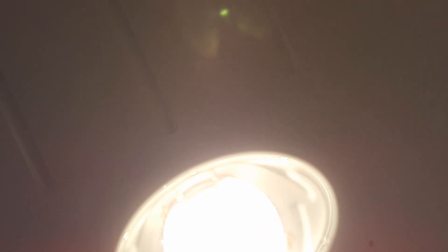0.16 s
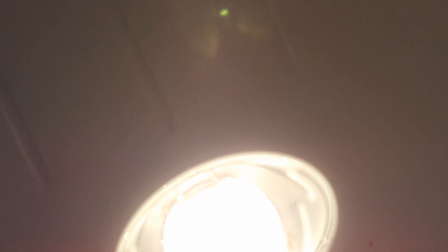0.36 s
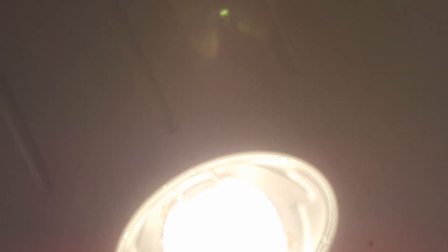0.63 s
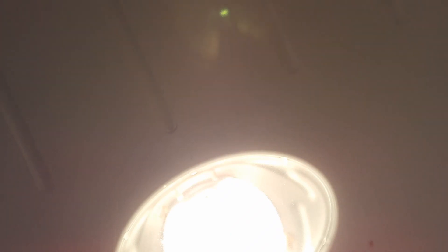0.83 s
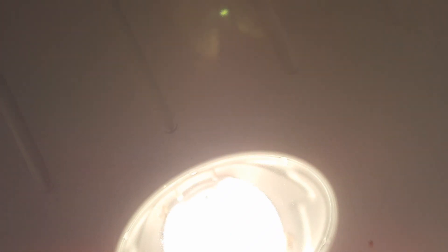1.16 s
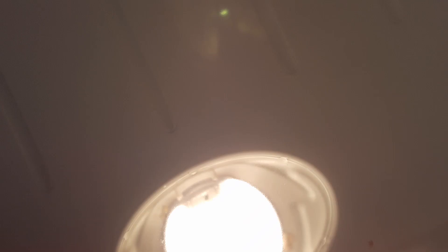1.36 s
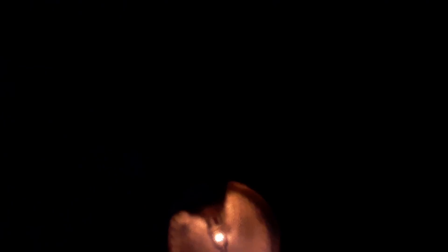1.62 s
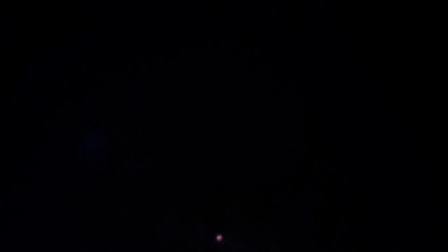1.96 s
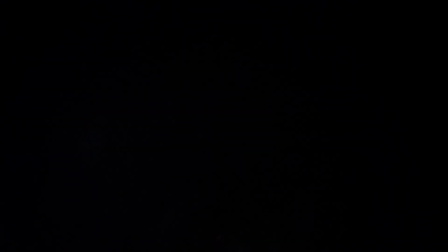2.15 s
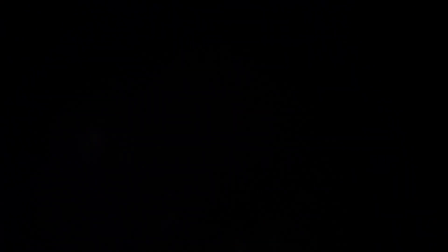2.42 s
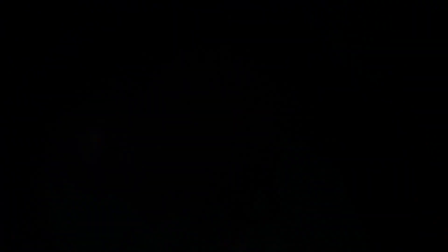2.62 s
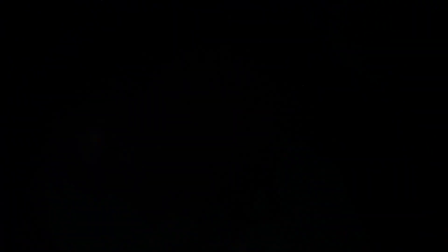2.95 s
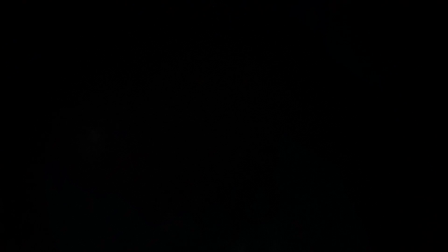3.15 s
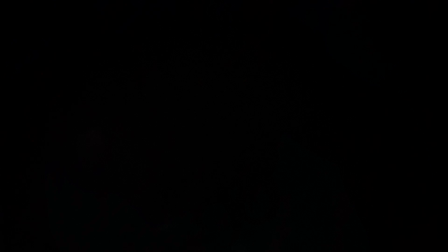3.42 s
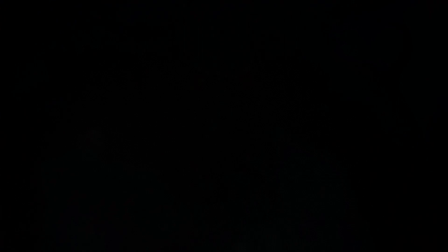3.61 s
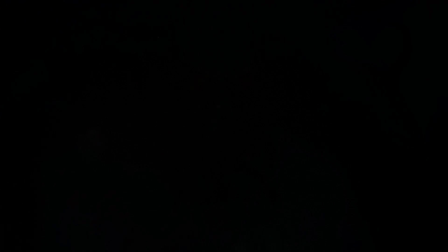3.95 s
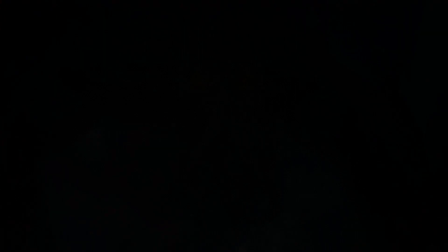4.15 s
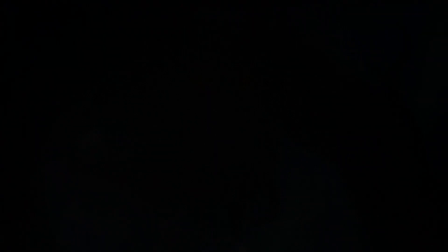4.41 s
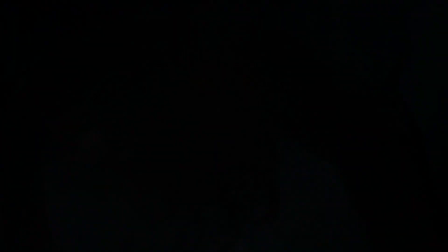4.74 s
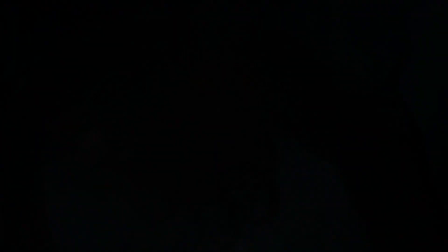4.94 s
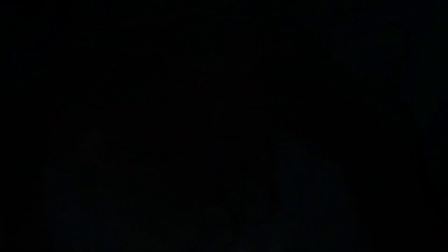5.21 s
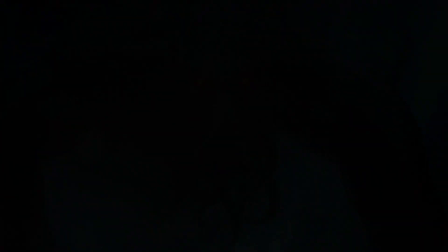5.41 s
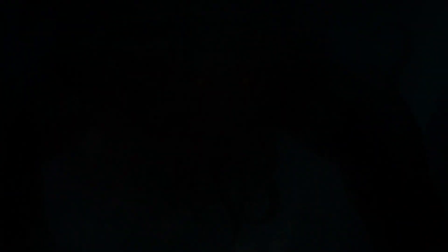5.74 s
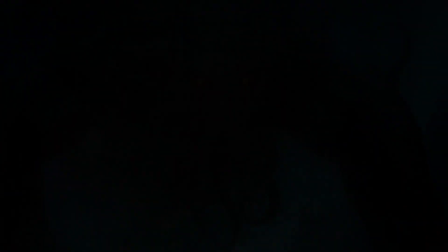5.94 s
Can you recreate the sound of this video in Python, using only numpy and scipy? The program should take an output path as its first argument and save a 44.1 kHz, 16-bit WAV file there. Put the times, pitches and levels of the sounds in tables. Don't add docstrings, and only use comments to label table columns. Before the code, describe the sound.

Heard from inside the fridge: soft seal slips, a heavy door slam at 1.4 seconds, shelf rattle, then low hum, fan whir and ticks.

```python
import sys
import numpy as np
from scipy import signal
from scipy.io import wavfile
from scipy.ndimage import uniform_filter1d

SR = 44100
rng = np.random.default_rng(int(sys.argv[2]) if len(sys.argv) > 2 else 0)


def generate_wav(signal):
    frames = np.transpose(np.atleast_2d(signal))
    scaled = np.clip(frames, -1, 1) * 32767
    pcm = np.round(scaled).astype(np.int16)
    wavfile.write(sys.argv[1], SR, pcm)


def field_ratio(decibels):
    return 10 ** (np.asarray(decibels, dtype=float) / 20)


N = 268348

SLAM_S, RATTLE_S = 1.3644, 1.3745
BLOW = slice(round(1.36 * SR), round(2.4 * SR))
EDGES_HZ = 22 * 2 ** np.arange(0, 9.7, 1 / 3)
FLOW_DB, FLOW_SAG_DB = -52.5, .15


def rms_one(x):
    return x / np.sqrt(np.mean(x ** 2) + 1e-20)


def in_time(rows):
    s, *columns = np.transpose(rows)
    return [np.interp(np.arange(N) / SR, s, column) for column in columns]


def at_hz(points, hz):
    table_hz, values = np.array(points)[:, 0], np.array(points)[:, 1]
    return np.interp(np.log(hz), np.log(table_hz), values)


def add_db(*levels_db):
    return 10 * np.log10(sum(field_ratio(db) ** 2 for db in levels_db) + 1e-14)


def drift(rate):
    r = np.exp(-80 * np.pi * rate / SR)
    steps = rng.standard_normal(N // 40 + 2002)
    slow = signal.lfilter([1], [1, -2 * r, r * r], steps)[2000:]
    return np.interp(np.arange(N) / 40, np.arange(len(slow)), rms_one(slow))


def resonate(x, hz, width_hz):
    r = np.exp(-np.pi * width_hz / SR)
    top = np.array([1, 0, -1]) * (1 - r * r) / 2
    return signal.lfilter(top, [1, -2 * r * np.cos(2 * np.pi * hz / SR), r * r], x)


def lean(hz):
    # f/Hz, level/dB
    left_over_right = [(60, -2.0), (150, -2.5), (380, -6.0), (950, -1.5), (2380, -3.5), (5980, -6.0),
                       (15000, -2.0)]
    return field_ratio(at_hz(left_over_right, hz) * np.array([[.5], [-.5]]))


def pair(mid, side, alike):
    alike = np.clip(alike, -.9, 1)
    return mid + np.sqrt((1 - alike) / (1 + alike)) * side * [[1], [-1]]


def shares(spectrum):
    hz = np.sqrt(EDGES_HZ[1:] * EDGES_HZ[:-1])
    power = field_ratio(at_hz(spectrum, hz)) ** 2 * hz * (hz > spectrum[0][0])
    return power / power.sum()


def noise_bands():
    white = rng.standard_normal((2, 2, N))
    for k, (low, high) in enumerate(zip(EDGES_HZ, EDGES_HZ[1:])):
        sos = signal.butter(2, [low, high], "band", fs=SR, output="sos")
        band = signal.sosfilt(sos, white[k % 2])
        mid, side = band / np.sqrt(2 * (high - low) / SR)
        yield k, np.sqrt(low * high), mid, side


def whistles(peaks, level_db, alike=0):
    white = pair(*rng.standard_normal((2, N)), alike)
    out = 0
    for k, (hz, width_hz, db) in enumerate(peaks):
        noise = np.roll(white, SR // 2 * k, axis=1)
        tone = resonate(resonate(noise, hz, width_hz), hz, width_hz)
        out = out + field_ratio(db) * lean(hz) * rms_one(tone)
    return field_ratio(level_db) * out


def after(start_s, rise_s, t60):
    t = np.maximum(np.arange(N)[BLOW] / SR - start_s, 0)
    return (1 - np.exp(-t / rise_s)) * field_ratio(-60 * t / t60)


def struck(hz, level_db, t60, start_s, phase=0):
    t = np.arange(N)[BLOW] / SR - start_s
    return field_ratio(level_db) * np.sin(2 * np.pi * hz * t + phase) * after(start_s, .0002, t60)


def kitchen_level():
    # t/s, level/dB
    through_door = [
        (0.0, -67),
        (0.11, -67),
        (0.716, -72.5),
        (1.046, -77),
        (1.1, -71),
    ]
    return in_time(through_door + [(1.4, -110)])[0]


def kitchen_tones():
    # f/Hz, width/Hz, level/dB
    tones = [
        (1370, 60, -3.5),
        (2260, 60, -9),
        (2790, 60, -9),
        (4905, 75, -.5),
    ]
    whistle_db = -72 - 110 * np.maximum(np.arange(N) / SR - .32, 0)
    return whistles(tones[:3], 12 + 1.25 * kitchen_level()) + whistles(tones[3:], whistle_db)


def fan_speed():
    # t/s, shaft speed/(turns per s)
    run_up = [(1.9, 29), (2.4, 33.5), (2.9, 37.8), (3.2, 40.8), (3.6, 42.9), (3.8, 43.8), (4.2, 44.8),
              (4.7, 45.4), (6.08, 45.9)]
    return in_time(run_up)[0]


def below_full(top_db, sag_db):
    missing = 46 - fan_speed()
    return top_db - sag_db * missing ** 2 - 40 * (np.arange(N) < 1.5 * SR)


def rumble():
    # t/s, half length/s, level/dB, upper modes relative to it/dB
    surges = [(-0.006, 0.048, -36, 9), (0.156, 0.09, -42.5, 11), (0.4, 0.073, -34.5, 2),
              (0.631, 0.09, -30.5, 1.7), (0.998, 0.11, -43, 8), (1.201, 0.058, -28, -4),
              (1.32, 0.046, -21.5, -5.5), (1.466, 0.061, -24, -20), (1.533, 0.022, -21, -1.5),
              (1.649, 0.11, -28, -7.5), (1.792, 0.023, -25, -10.5), (1.87, 0.019, -33, -1),
              (2.087, 0.12, -32, -16.3), (2.223, 0.038, -27.5, -13), (2.331, 0.029, -32, -7.5),
              (2.49, 0.068, -34, -10), (2.602, 0.083, -33, -10.5), (2.946, 0.099, -37.5, -11),
              (3.285, 0.12, -34.5, -13.5), (3.692, 0.062, -32, -20), (3.84, 0.11, -36.5, -6),
              (4.117, 0.069, -30.5, -13.5), (4.254, 0.023, -32.5, -5), (4.412, 0.069, -33, -10.5),
              (4.548, 0.053, -32, -9), (4.763, 0.11, -33, -21), (5.25, 0.19, -41.5, -28),
              (5.641, 0.11, -36, -2), (5.821, 0.038, -51.5, 16.5), (5.935, 0.14, -31.5, -4.5)]
    mode_floor = (-52, -55.5, -54)
    t = np.arange(0, N + 64, 64) / SR
    s, half_s, db, upper_db = np.transpose(surges)[:, :, None]
    bell, shut = np.exp(-((t - s) / half_s) ** 2), t > SLAM_S
    low, second = (10 * np.log10((field_ratio(d) ** 2 * bell).sum(axis=0) + 1e-14) for d in (db, db + upper_db))
    low = low + np.where(shut, 0, -9.9)
    cross = add_db(second + np.where(shut, -13, -7), low - 13.5)
    modes = [add_db(level, floor) for level, floor in zip((low, second, cross), mode_floor)]
    blurred = uniform_filter1d(add_db(low - 6, second, -56.5), size=round(.2 * SR / 64))
    thump = -25.5 - np.where(t < RATTLE_S, 10 * (RATTLE_S - t) / .1, 60 * (t - RATTLE_S) / .22)
    curves = modes + [blurred, thump]
    *modes, blurred, thump = [np.interp(np.arange(N) / SR, t, level) for level in curves]
    flow = below_full(FLOW_DB, FLOW_SAG_DB)
    outside = np.where(np.arange(N) > SLAM_S * SR, -60.5, -49.5)
    deep = add_db(outside, thump, flow + 2)
    return modes, deep, add_db(-52, blurred - 12.5, flow + 2.5)


def drag(top_db, rise_db_s):
    t = np.arange(N) / SR
    return np.where((t > 0.96) & (t < RATTLE_S), top_db - rise_db_s * (SLAM_S - t), -120)


def noises(deep_db, upper_db):
    # f/Hz, level/dB (per Hz)
    deep = [(12, -62), (20, -29), (38, -9.5), (64, -23.5), (90, -4), (120, -23.5), (200, -120)]
    upper = [(41, -36.5), (70, -18.5), (120, -6.5), (150, -6), (227, -10.5), (278, -21), (344, -5.5),
             (486, -45), (860, -29.5), (1200, -55.5), (1560, -81.5), (2640, -120)]
    fan_air = [(240, -34.5), (400, 8.5), (577, 3.5), (667, -29), (778, -0.5), (907, -1.5), (1260, -7.5),
               (1700, -68.5), (2120, -22.5), (2350, -29.5), (4000, -34), (5200, -67), (8800, -120)]
    kitchen_air = [(590, -46), (1000, -24), (1090, -14), (1370, -2.5), (1840, -5.5), (4360, -15.5),
                   (4940, -9.5), (5920, -14), (7860, -5), (15000, -33.5)]
    hiss = [(710, -37), (1200, -11.5), (1880, -8), (2190, 4), (2360, -4.5), (4950, -15), (7290, -9),
            (15600, -6.5)]
    drag_body = [(120, -20.5), (200, -7), (276, -3.5), (329, -9), (420, -19.5), (1500, -31.5), (1950, -72),
                 (3300, -120)]
    scuff = [(710, -33), (1200, -13.5), (2920, 4.5), (4670, -0.5), (8510, -4), (9780, -22.5),
             (12600, -10.5), (15500, -33.5)]
    # f/Hz, likeness (1 = same)
    likeness = [(60, 0.86), (120, 1), (240, 0.32), (480, 0.59), (950, 0.04), (1890, 0.15), (3770, -0.85),
                (7520, 0.17), (15000, 0.071)]
    layers = [(deep, deep_db), (upper, upper_db), (fan_air, below_full(FLOW_DB, FLOW_SAG_DB)),
              (kitchen_air, kitchen_level()), (hiss, np.full(N, -75.5)),
              (drag_body, drag(-28, 82)), (scuff, drag(-52, 68))]
    share = np.array([shares(spectrum) for spectrum, _ in layers])
    power = field_ratio(np.array([level_db for _, level_db in layers])) ** 2
    out, together = np.zeros((2, N)), drift(7.8)
    for k, hz, mid, side in noise_bands():
        flutter = field_ratio(1.1 * together + 1.6 * drift(12))
        steady = np.sqrt(share[:, k] @ power) * flutter
        out += steady * lean(hz) * pair(mid, side, at_hz(likeness, hz))
    return out


def hum(modes_db, deep_db, upper_db):
    # f/Hz (door open), f/Hz (door shut), phase wander/rad
    hum_modes = [
        (112, 101, .8),
        (143, 143, .7),
        (218, 217, .6),
    ]
    # f/Hz, width/Hz, level/dB
    side_modes = [(47.8, 3.3, -4), (195.4, 18, -1), (249.9, 14, -11.5), (330, 11, -10), (359.8, 12, -9.5)]
    out, shut = 0, np.arange(N) > SLAM_S * SR
    for (open_hz, shut_hz, wander), level_db in zip(hum_modes, modes_db):
        phase = 2 * np.pi * np.cumsum(np.where(shut, shut_hz, open_hz)) / SR + wander * drift(5)
        strength = field_ratio(level_db + 1.7 * drift(35) + .7 * drift(5))
        tone = np.sqrt(2) * np.sin(phase + np.array([[0], [.15]]))
        out = out + lean(shut_hz) * strength * tone
    upper = whistles(side_modes[1:], upper_db, alike=0.72)
    return out + upper + whistles(side_modes[:1], deep_db, alike=0.93)


def fan():
    # multiple, housing f/Hz, width/Hz, level/dB
    order_peaks = [(6, 246, 36, -43.5), (7, 313, 10.0, -38.5), (7, 291, 16, -47)]
    # f/Hz, width/Hz, level/dB
    whine = [(4560, 180, -2.5), (4820, 610, 0.5), (5043, 100, -3), (2130, 240, -1.5), (2657, 170, -8.5)]
    # start of its swell t/s, level/dB, rise/s, t60/s
    duct_ring = (0.2, -51, .04, 2.3)
    speed, t = fan_speed(), np.arange(N) / SR
    angle = 2 * np.pi * np.cumsum(speed + .1 * drift(6)) / SR
    lines = 0
    for order, hz, width_hz, db in order_peaks:
        strength = field_ratio(below_full(db, 0.05) + 1.9 * drift(6.8))
        housing = 1 / (1 + ((order * speed - hz) * 2 / width_hz) ** 2)
        tone = np.sin(order * angle + np.array([[0], [1.3]]))
        lines = lines + strength * housing * tone * lean(220)
    ring_s, ring_db, rise_s, t60 = duct_ring
    ring = np.full(N, 1e-6)
    ring[BLOW] += field_ratio(ring_db) * after(ring_s, rise_s, t60)
    idle_db = -65.5 - 11.5 * np.exp(-t / 0.27)
    duct_db = add_db(idle_db, 20 * np.log10(ring), below_full(FLOW_DB - 5.5, FLOW_SAG_DB))
    duct = whistles([(763.8, 42.4, 2.0), (560.7, 59, -3.5)], duct_db, alike=0.37)
    return lines + whistles(whine, below_full(-76, .1) + 0.5 * drift(5.7)) + duct


def small_knocks(rows, sharp, top_hz, rise_share):
    out, size = np.zeros((2, N + SR)), SR // 4
    t = np.arange(size) / SR
    crackle_band = signal.butter(3, [1800, top_hz], "band", fs=SR, output="sos")
    for s, peak_db, hz, t60, bright_db in rows:
        grains = rng.standard_normal((2, size)) * field_ratio(5.3 * rng.standard_normal(size))
        bright = signal.sosfilt(crackle_band, grains)
        ring = resonate(resonate(grains, hz, hz / sharp), hz, hz / sharp)
        burst = rms_one(ring) + field_ratio(bright_db - 15 * t / t60) * rms_one(bright)
        shape = (1 - np.exp(-t / max(rise_share * t60, 3e-4))) * field_ratio(-60 * t / t60)
        start = round(s * SR)
        out[:, start:start + size] += field_ratio(peak_db - 1.0) * lean(hz) * burst * shape / shape.max()
    return out[:, :N]


def plastic():
    # t/s, peak level/dB, ring f/Hz, t60/s, bright part level/dB
    tick_rows = [(1.540, -52, 575, .45, -50), (1.5945, -62, 3200, .03, -20), (1.6445, -58, 3600, .04, -8),
                 (1.6775, -52, 1520, .09, -25), (1.7255, -52, 800, .05, -30), (1.860, -52, 760, .25, -50),
                 (2.2085, -63, 2200, .15, -28), (2.530, -48, 375, .45, -50), (3.2255, -42, 2150, .07, -30),
                 (3.231, -39, 500, .2, -45), (3.237, -61, 3200, .06, -30), (3.238, -36.5, 780, .32, -45),
                 (4.819, -42, 460, .2, -45), (4.8225, -37, 2330, .09, -35), (4.823, -51, 4700, .07, -20),
                 (4.8325, -44, 2500, .13, -40)]
    # t/s,
    # level/dB, f/Hz, t60/s, bright level/dB
    knock_rows = [(1.3772, -21, 1290, 0.11, -34), (1.631, -51, 1610, 0.1, -18),
                  (1.679, -58, 1650, .12, -17.5), (1.7265, -56, 1483, .09, -17),
                  (1.412, -28.5, 1000, .09, -26.5), (2.185, -67, 1500, 0.12, -20.5),
                  (2.208, -67, 1587, 0.18, -16.5), (3.230, -38, 650, 0.21, -26),
                  (3.2305, -36, 1710, 0.1, -33), (4.816, -44, 2150, 0.14, -18), (4.824, -38, 565, 0.3, -27),
                  (4.83, -50, 1290, 0.21, -30)]
    sharp_ticks = small_knocks(tick_rows, sharp=15.0, top_hz=7000, rise_share=.04)
    return sharp_ticks + small_knocks(knock_rows, sharp=2.5, top_hz=9000, rise_share=.025)


def seal():
    # t/s, peak level/dB, ring f/Hz, t60/s, bright part level/dB
    slips = [(0.4565, -48.5, 1700, 0.13, 2), (1.012, -65.5, 6960, 0.2, -11), (1.0741, -53.5, 1450, .12, -2),
             (1.1379, -44, 1630, 0.067, -9), (1.190, -51, 3560, 0.12, -15), (1.1958, -45, 1487, 0.11, -13),
             (1.2407, -46, 7350, 0.12, -9.5), (1.241, -54.5, 11500, 0.055, -8), (1.2646, -37, 4576, .1, -8),
             (1.265, -45.5, 11600, 0.09, -9.5), (1.31, -43.5, 1400, 0.28, -2),
             (1.347, -47.5, 6000, 0.19, -5)]
    return small_knocks(slips, sharp=1.0, top_hz=9600, rise_share=.011)


def rattle():
    # f/Hz, level/dB (per Hz)
    rattle_colour = [(88, -24.5), (150, -4.5), (339, -10), (657, -10), (914, -3.5), (1770, -13),
                     (2070, -4.5), (2990, -16.5), (4250, -16), (8390, -21.5), (9420, -30.5), (15600, -36)]
    # f/Hz, t60/s
    rattle_t60 = [(200, 0.29), (700, 0.13), (2000, 0.097), (5000, 0.12), (12000, .13)]
    # f/Hz, level/dB (per Hz)
    shudder_colour = [(250, 7.5), (600, 1), (1500, -10), (3000, -21), (3600, -37.5), (6000, -74)]
    # f/Hz, likeness (1 = same)
    slam_likeness = [(60, 0.89), (130, 0.87), (290, 0.97), (640, 0.68), (1410, -0.19), (3100, 0.65),
                     (6820, 0.12), (15000, 0.15)]
    rattle_share, shudder_share = shares(rattle_colour), shares(shudder_colour)
    crack = field_ratio(-19) * after(SLAM_S + .0006, .0005, .035)
    shudder = field_ratio(-38) * after(SLAM_S, .01, .75)
    jolt = 0.55 * after(RATTLE_S + .002, 0.00061, 0.022)
    out = np.zeros((2, N))
    for k, hz, mid, side in noise_bands():
        shelves = field_ratio(-17) * (after(RATTLE_S, 0.002, at_hz(rattle_t60, hz)) + jolt)
        dull_crack = crack ** 2 / (1 + (hz / 6000) ** 2)
        strength = np.sqrt(rattle_share[k] * (dull_crack + shelves ** 2) + shudder_share[k] * shudder ** 2)
        out[:, BLOW] += strength * lean(hz) * pair(mid[BLOW], side[BLOW], at_hz(slam_likeness, hz))
    return out


def slam():
    # f/Hz, level/dB, t60/s
    door = [(569, -9, 0.65), (680, -16.5, 0.24), (822, -1.5, 0.33), (905, -3.5, 0.17), (1404, -2, 0.17),
            (1560, -18, 0.27), (1778, -10.5, 0.099), (1885, -2.5, 0.14)]
    # f/Hz, level/dB, t60/s
    sloshing = (280, -8, .07)
    # f/Hz, level/dB, t60/s
    latch = (1200, -4, 0.014)
    out, t = np.zeros((2, N)), np.arange(N)[BLOW] / SR - SLAM_S
    push = 0.22 * np.exp(-((t + 0.00046) / 0.00059) ** 2)
    dip_s, dip_width_s = np.array([[.0010], [.0016]]), np.array([[.0003], [.0006]])
    dip = np.exp(-((t - dip_s) / dip_width_s) ** 2)
    out[:, BLOW] = field_ratio(-.6) * (push - dip * field_ratio(np.array([[0.5], [-3]])))
    out[0, BLOW] += field_ratio(-4.5) * np.exp(-((t - .0020) / 0.00029) ** 2)
    out[:, BLOW] += struck(*sloshing, SLAM_S + .0027) * [[-.6], [1]]
    out[1, BLOW] -= struck(*latch, SLAM_S + .0012)
    for hz, level_db, t60 in door:
        phase = rng.uniform(0, 2 * np.pi, (2, 1))
        out[:, BLOW] += struck(hz, level_db - 26.0, min(t60, .6), SLAM_S + 0.0024, phase)
    return out


def scene():
    modes_db, deep_db, upper_db = rumble()
    background = kitchen_tones() + noises(deep_db, upper_db) + hum(modes_db, deep_db, upper_db)
    return background + fan() + plastic() + seal() + rattle() + slam()


def roll_off(x):
    return signal.sosfilt(signal.butter(12, 15770, fs=SR, output="sos"), x)


def record(dry):
    deep_cut = signal.butter(3, 41, "high", fs=SR, output="sos")
    top_cut = signal.ellip(14, .5, 75, 15700, fs=SR, output="sos")
    mix = signal.sosfilt(np.vstack([deep_cut, top_cut]), dry)
    return roll_off(mix)


dry = scene()
out = record(dry)
generate_wav(out)
```